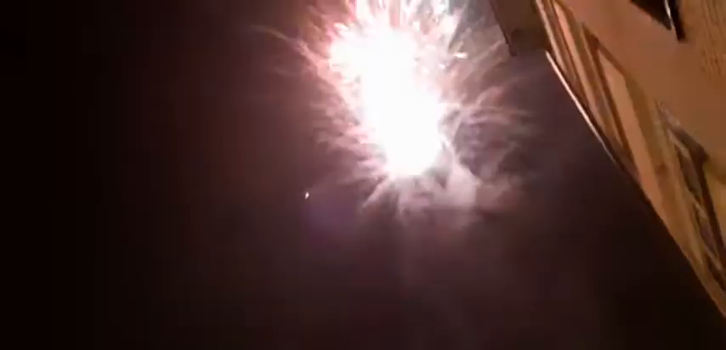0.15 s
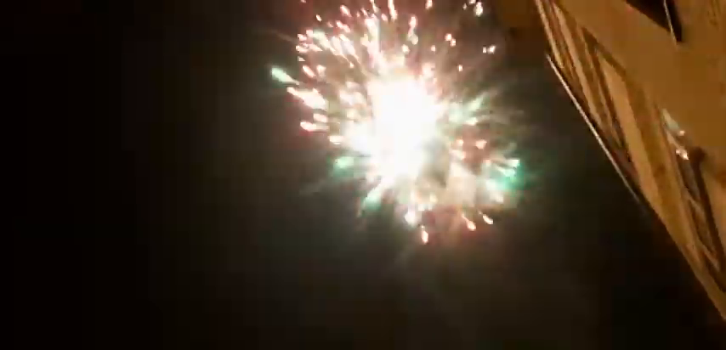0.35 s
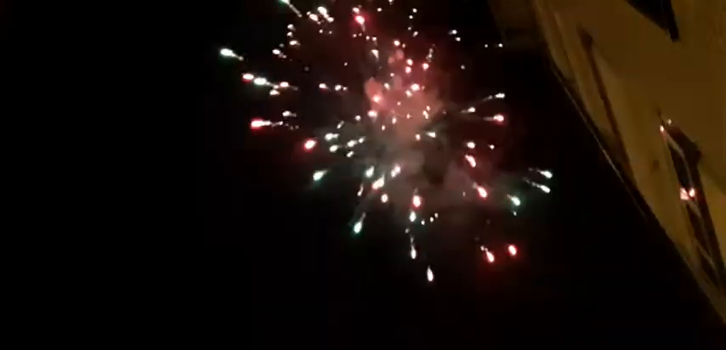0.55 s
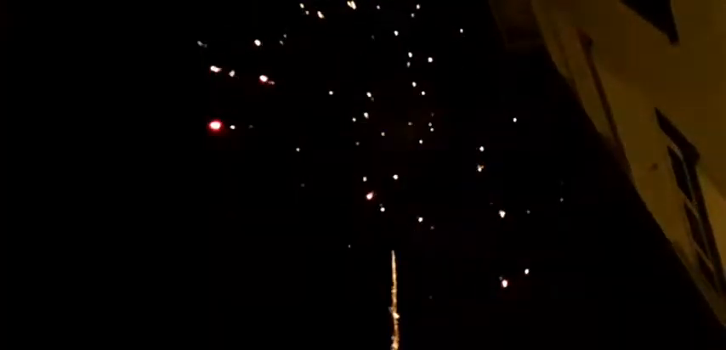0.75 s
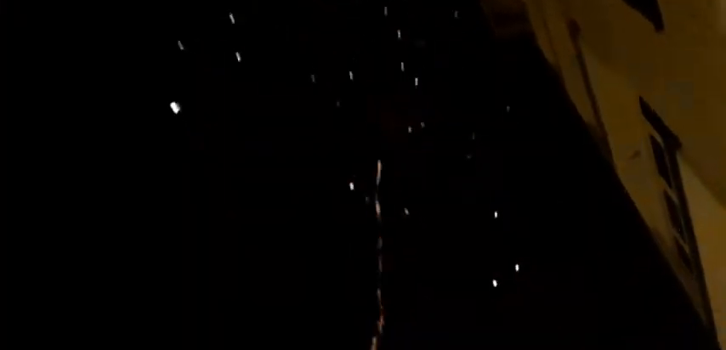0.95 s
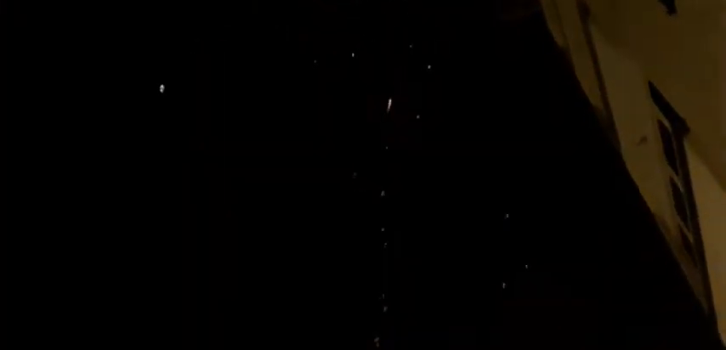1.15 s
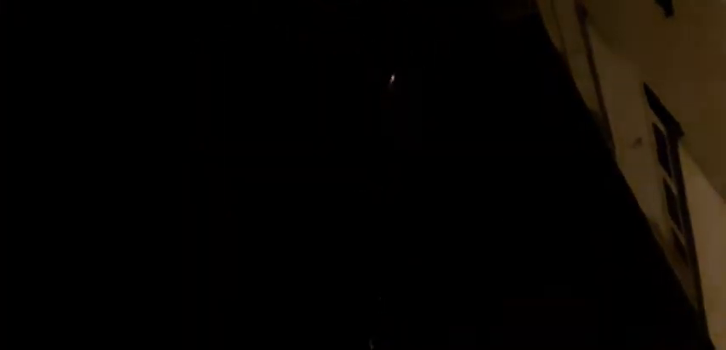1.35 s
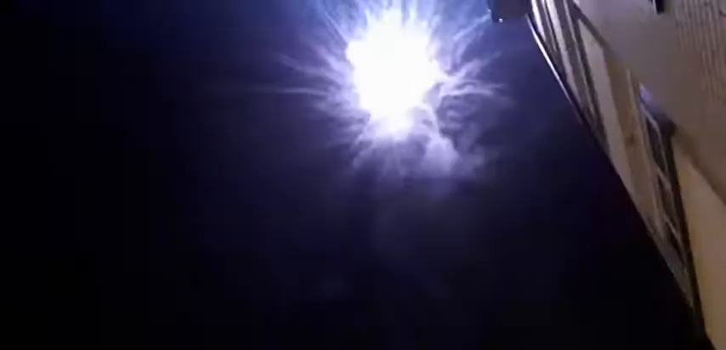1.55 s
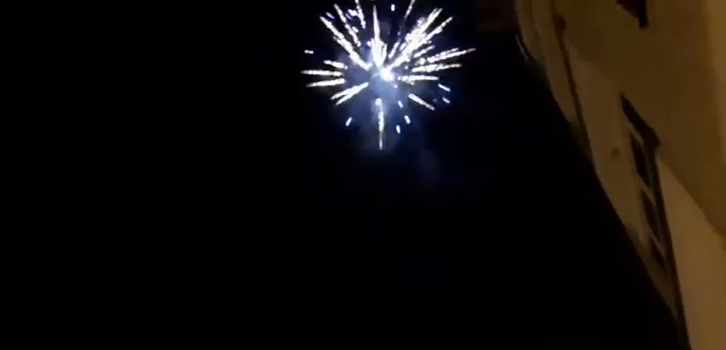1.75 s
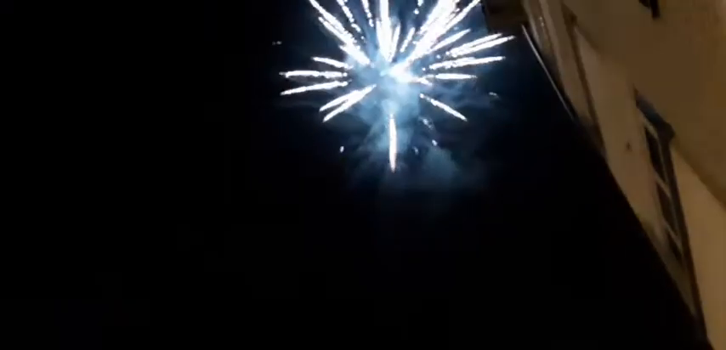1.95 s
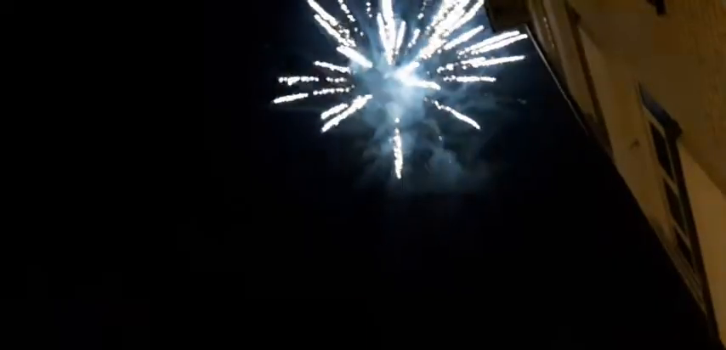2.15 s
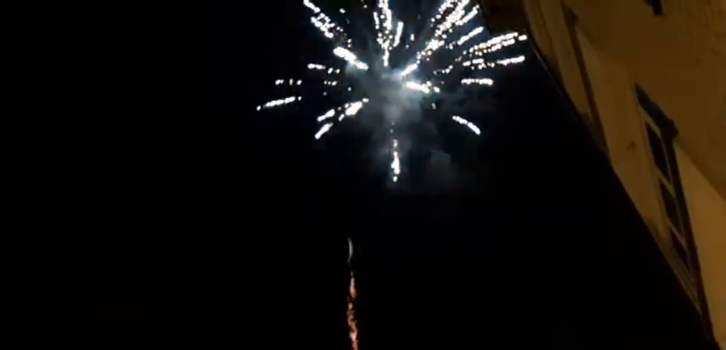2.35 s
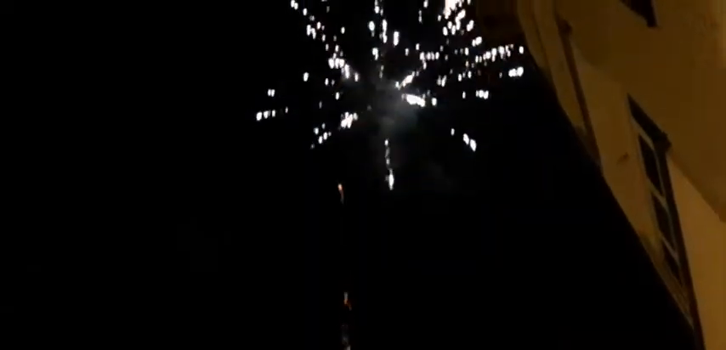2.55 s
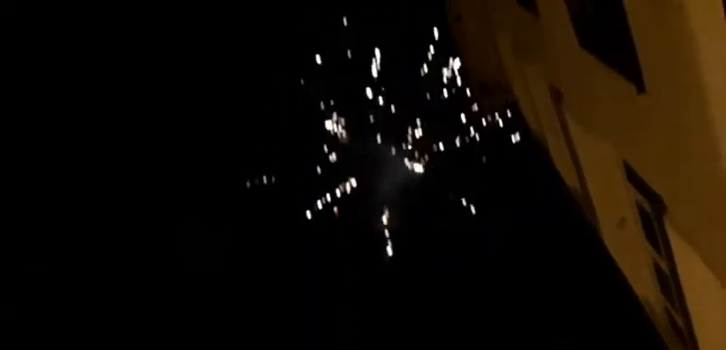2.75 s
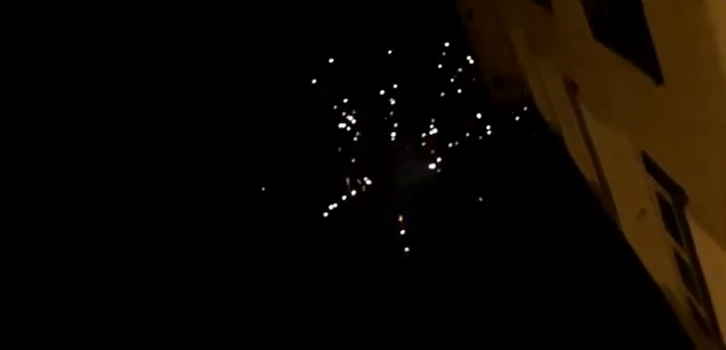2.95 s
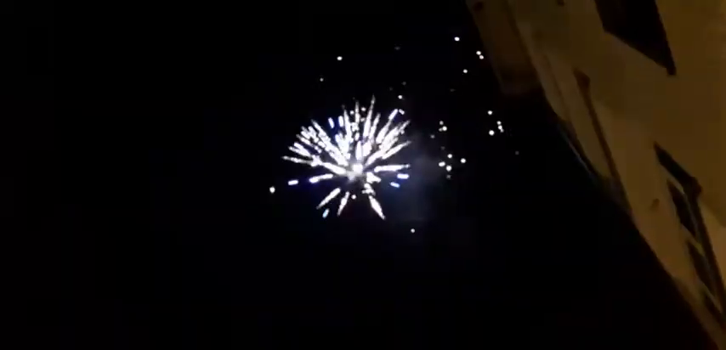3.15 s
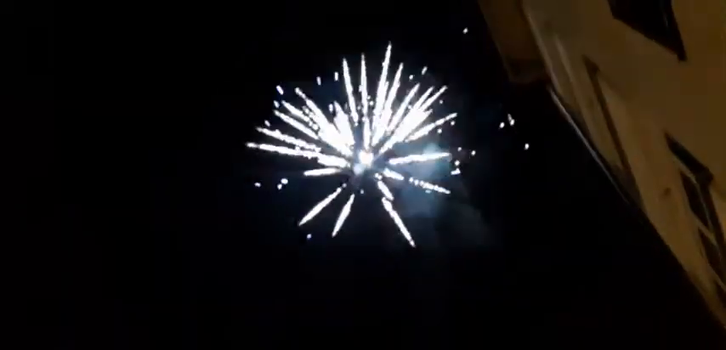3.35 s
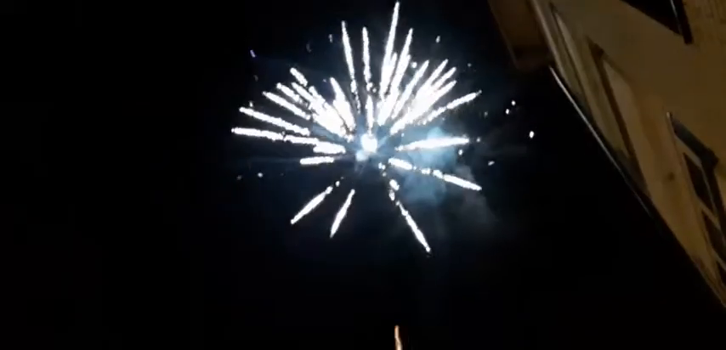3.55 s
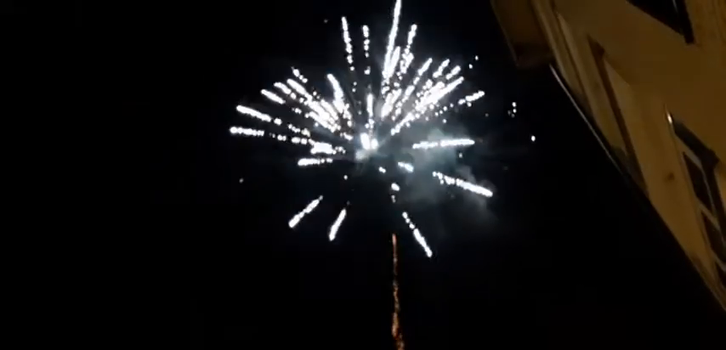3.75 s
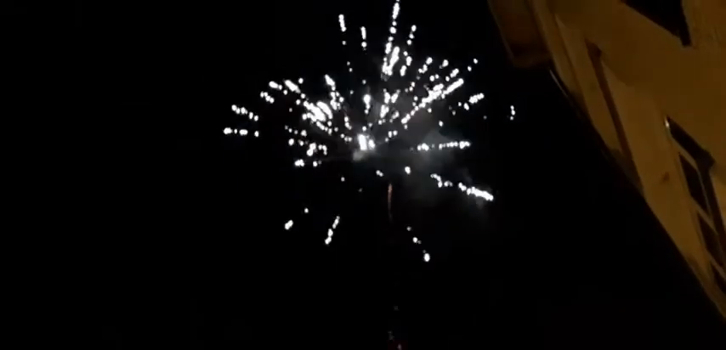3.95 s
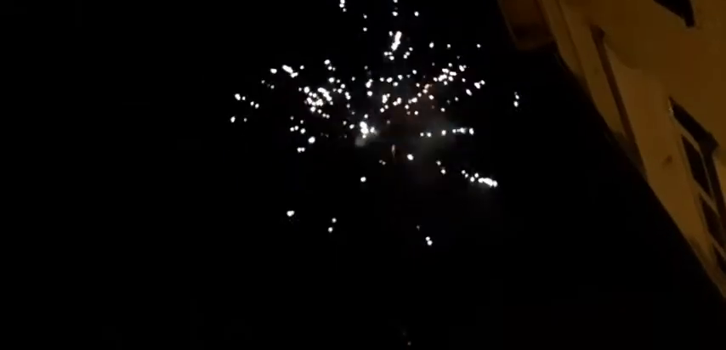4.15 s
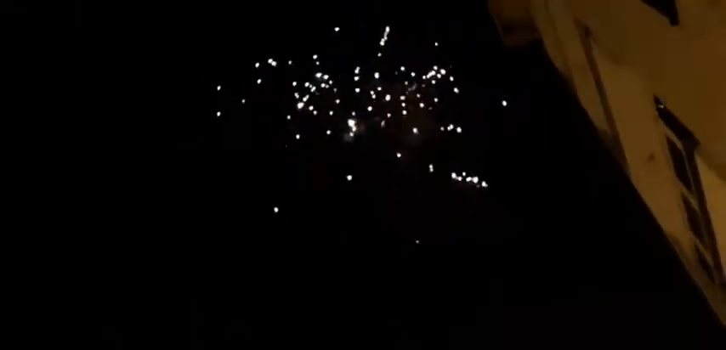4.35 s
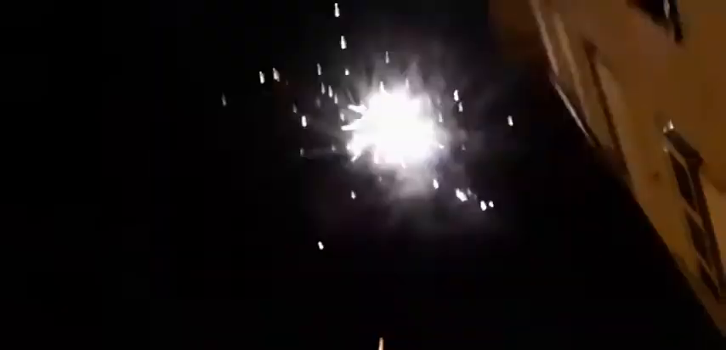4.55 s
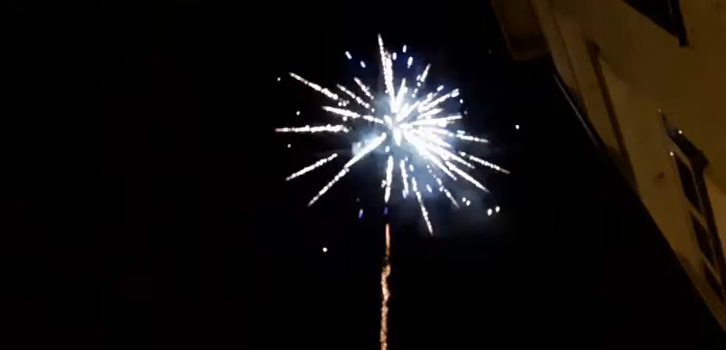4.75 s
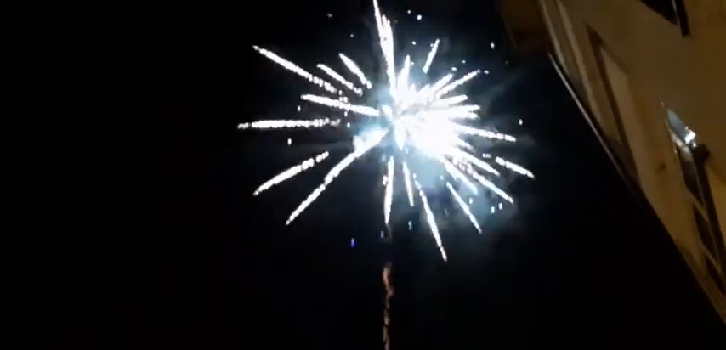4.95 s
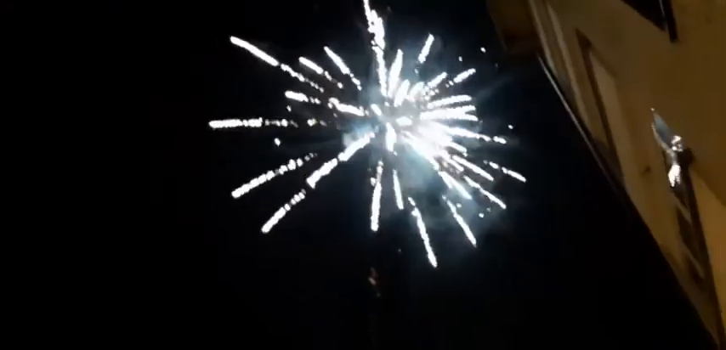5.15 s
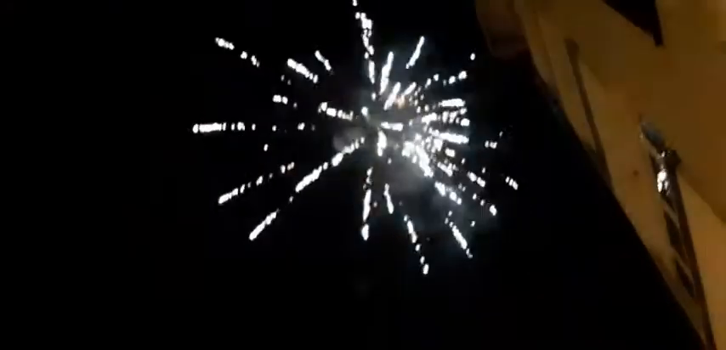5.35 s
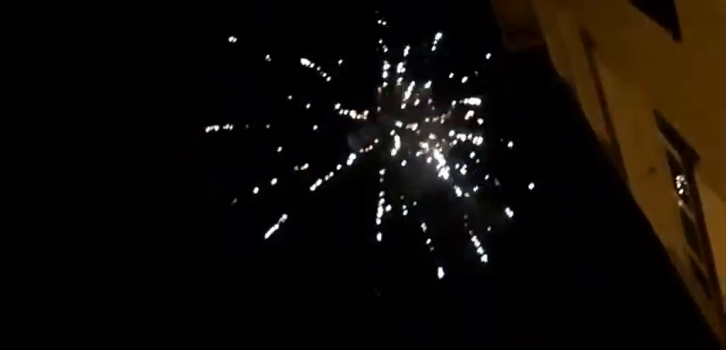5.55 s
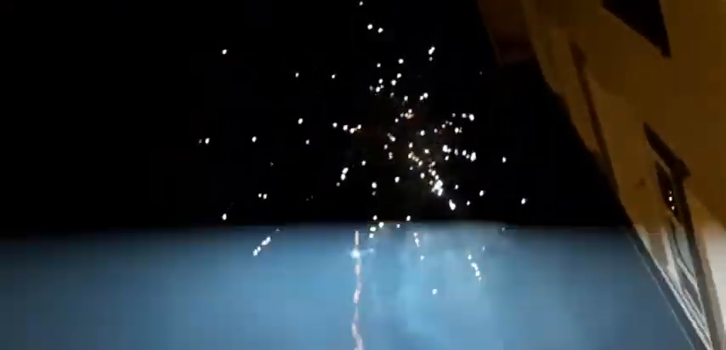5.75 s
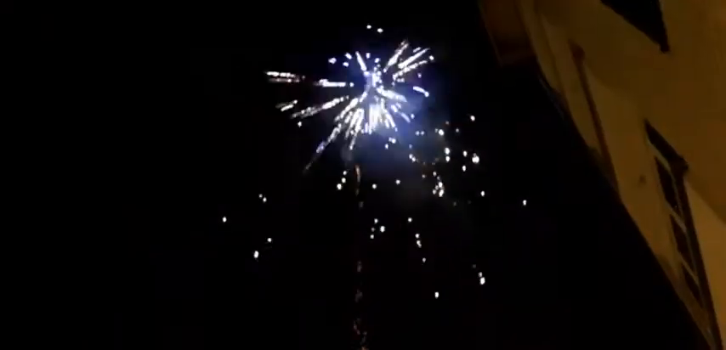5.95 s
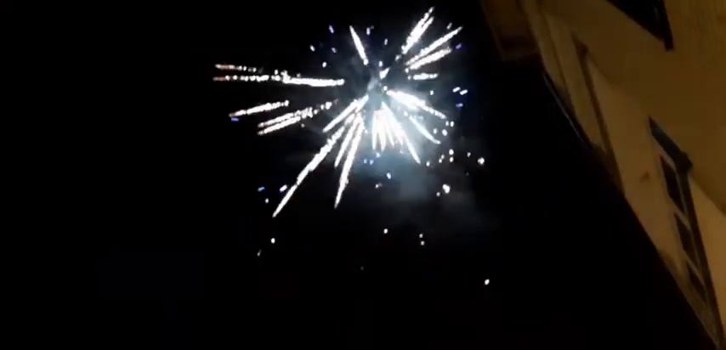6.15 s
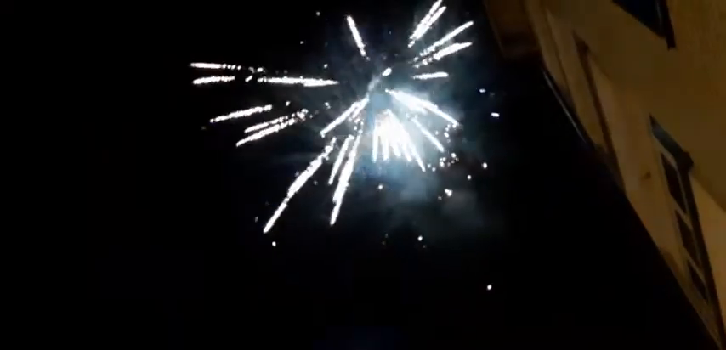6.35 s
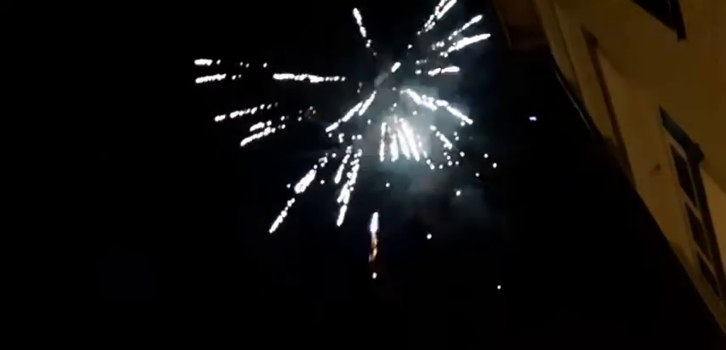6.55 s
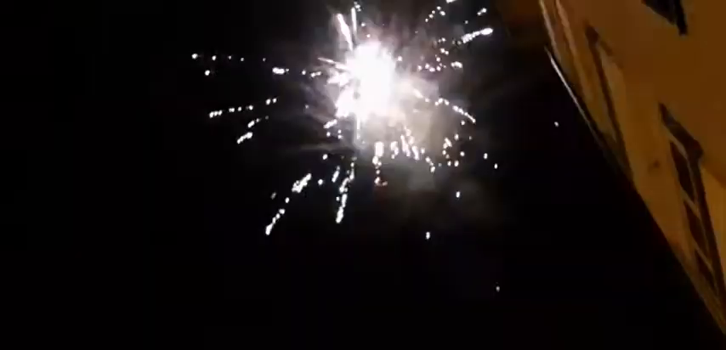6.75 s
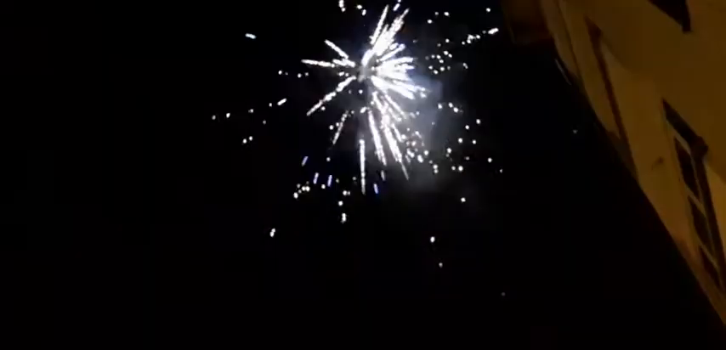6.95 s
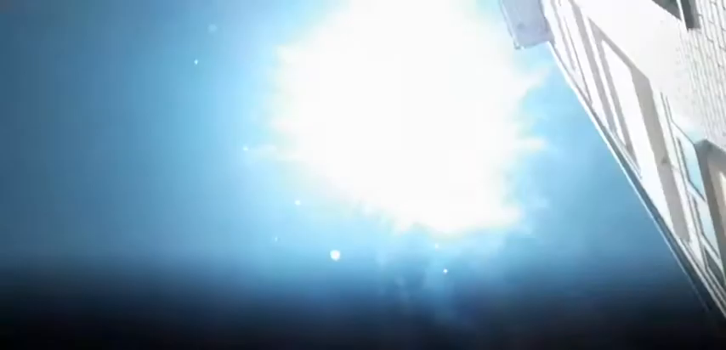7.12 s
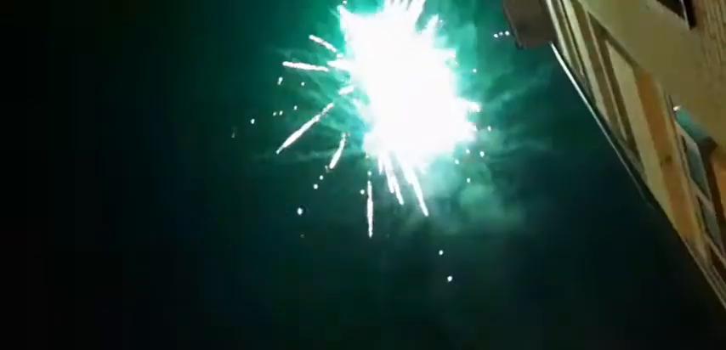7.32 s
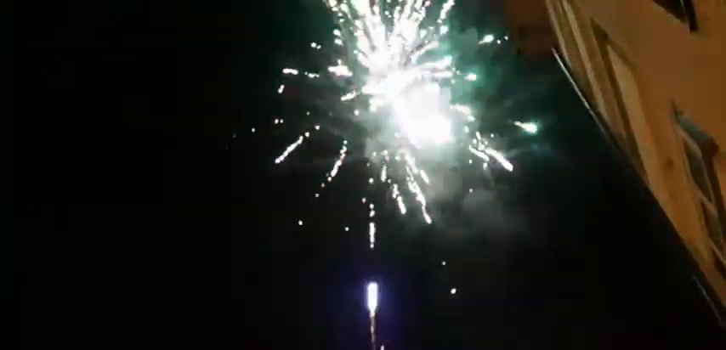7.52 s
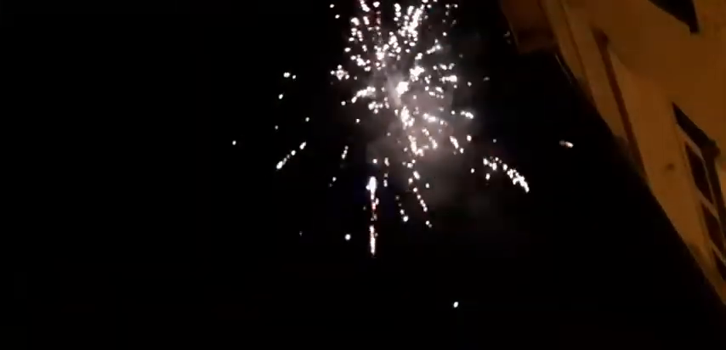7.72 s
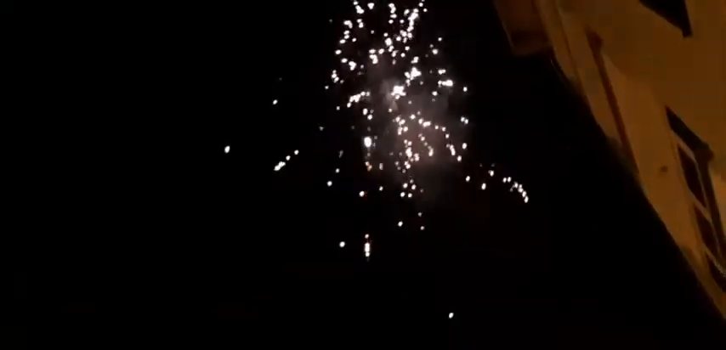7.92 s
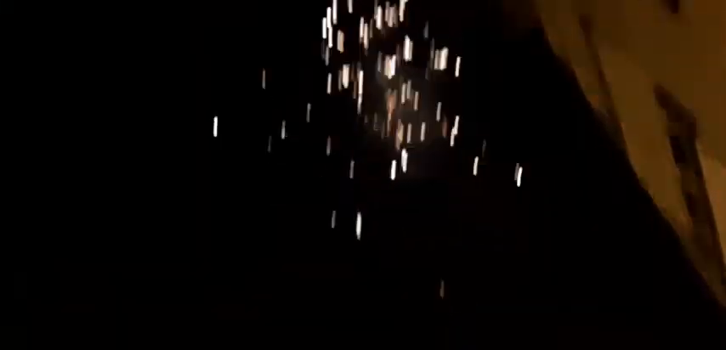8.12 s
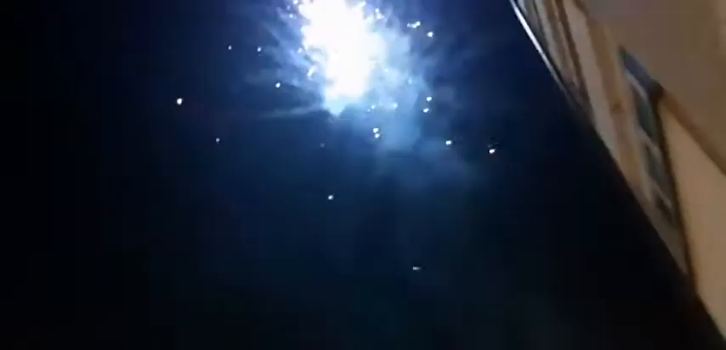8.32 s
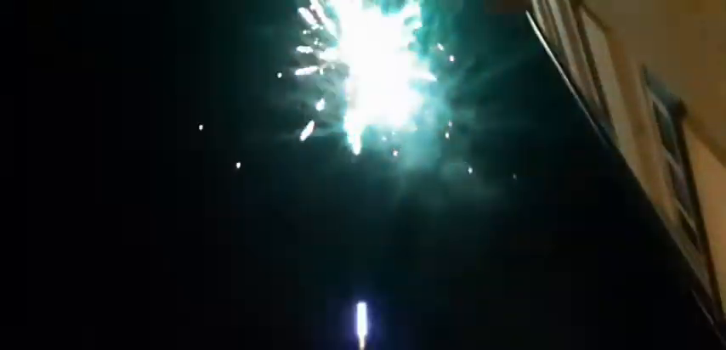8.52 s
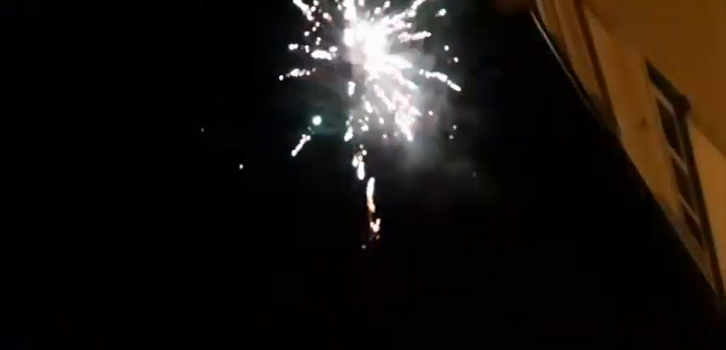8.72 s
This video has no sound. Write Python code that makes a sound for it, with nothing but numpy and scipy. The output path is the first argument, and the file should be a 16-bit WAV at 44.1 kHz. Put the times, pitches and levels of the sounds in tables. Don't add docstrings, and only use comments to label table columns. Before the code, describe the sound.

A fading echo and tiny star snaps lead into a tight cluster at 0.14-0.4 s: two ragged overhead cracks with mortar thumps, then dull far slaps near 0.8-1.0 s. A very loud burst hits at 1.66 s, a launch thump at 1.94 s, and a smaller pop to the right at 2.39 s among distant slaps. At 3.1 s a burst fills the street with its fullest wash, a thump follows at 3.27 s, and bright crackling runs from 3.5 to 4.1 s. A strong slap comes at 3.8 s, a right-hand pop and thump at 4.3 s, a loud burst at 4.6 s and a thump at 5.4 s. The closing run brings blasts at 5.9, 6.2 and 6.8 s, then near-simultaneous burst-and-mortar pairs at 7.24 and 8.33 s. Each blast echoes off close houses, then decays treble first over a low night hum.

```python
import sys
import numpy as np
from scipy import signal
from scipy.fft import rfft, irfft, next_fast_len
from scipy.io import wavfile
from scipy.ndimage import uniform_filter1d

SR = 44100
rng = np.random.default_rng(int(sys.argv[2]) if len(sys.argv) > 2 else 0)


def output_pcm(signal):
    pcm = np.clip(np.atleast_2d(signal).T, -1, 1) * 32767
    wavfile.write(sys.argv[1], SR, np.round(pcm).astype(np.int16))


def linear_from_db(decibels):
    return 10 ** (np.asarray(decibels, float) / 20)


N = 387198

# start in seconds [s], peak level [dB], wash level [dB].
MORTAR_SHOTS = [
    (0.236, -26, -19.5),
    (0.3893, -7, -21.5),
    (1.9389, -8.5, -22.5),
    (3.2692, -6.5, -18),
    (4.3427, -6, -20),
    (5.385, -4.2, -20),
    (6.1882, -5, -19),
    (7.2356, -6.5, -15),
    (8.3232, -3.5, -14),
]
# start in seconds [s], peak level [dB], wash level [dB].
SHELL_BURSTS = [
    (0.1425, -3.2, -15.5),
    (0.2467, -2, -14),
    (1.6601, -1, -10.5),
    (3.105, -2.5, -9),
    (4.6199, -1, -12),
    (5.9167, -2, -14),
    (6.8255, -2, -14.5),
    (7.2385, -3, -18.5),
    (8.3387, -3.5, -18),
]
# start in seconds [s], peak level [dB], wash level [dB].
SIDE_SHOTS = [
    (2.3898, -4.5, -33),
    (4.307, -3.5, -29.5),
    (5.9043, -4.5, -38),
    (7.0953, -6.5, -30),
]
# arrival in seconds [s], peak level [dB].
FAR_SLAPS = [(0.827, -12.5), (0.9582, -10.5), (2.363, -9.5), (2.4193, -9.5), (2.462, -32), (2.717, -18.5),
             (3.8203, -6), (4.17, -23), (5.3255, -12), (6.608, -14), (6.7228, -27), (7.127, -12.5),
             (7.9422, -11.5), (7.981, -24)]
# start in seconds [s], peak level [dB].
STAR_SNAPS = [(0.0356, -22.5), (0.068, -22), (0.0958, -22), (0.8307, -29), (1.0827, -26.5), (2.7144, -32),
              (2.7195, -49), (3.477, -18.5), (3.517, -18.5), (3.551, -17.5), (3.568, -25), (3.5713, -16),
              (3.603, -20.5), (3.6378, -36), (3.6655, -22.5), (3.765, -25), (3.778, -21), (3.9093, -27.5),
              (3.9714, -25), (3.9768, -26.5), (4.0283, -43), (4.0885, -34), (4.105, -32), (5.247, -37),
              (5.7073, -30), (6.4523, -67.5), (6.489, -27), (6.567, -27.5), (6.589, -27.5), (8.295, -39)]

# delay in seconds [s], level [dB], side [-1 right .. 1 left].
MORTAR_PATHS = [(0, 0, .25), (.0031, -8, -1), (.0082, -9, .8)]
# delay in seconds [s], level [dB], side [-1 right .. 1 left].
BURST_PATHS = [(0, 0, .25), (.0086, -1, .8)]
# delay in seconds [s], level [dB], side [-1 right .. 1 left].
STAR_PATHS = [(0, 4, .45), (.0034, -3, -.65), (.0045, 0, .9)]
# delay in seconds [s], level [dB], side [-1 right .. 1 left].
SIDE_PATHS = [(0, -1, -1), (.0014, -6, -1), (.0024, -10, -.8), (.01, -14, -.8), (.0115, -14, -.8)]
# delay in seconds [s], level [dB], side [-1 right .. 1 left].
FACING_ROW = [(.0237, -3, -.6), (.0243, -4, -.6), (.0254, -9, -.6), (.0305, -9, -.6)]
# delay in seconds [s], level [dB], side [-1 right .. 1 left].
FAR_ROWS = [(.0805, -7, -.3), (.0818, -11, -.3), (.1015, -14, .4)]
# delay in seconds [s], level [dB], side [-1 right .. 1 left].
END_WALL = [(.092, -1, -.5), (.101, -3, -.2), (.122, -9, -.4), (.161, -14, -.4)]

# frequency [Hz], density [dB per Hz].
WASH_COLOUR = [(15, -84.5), (25, -71.5), (97, -10), (259, 0), (422, -4), (706, -1.5), (787, -4),
               (1680, -11), (2530, -12), (4480, -19.5), (7510, -31), (9330, -23.5), (14800, -30.5),
               (16500, -39)]
# frequency [Hz], first t60 in seconds [s], late t60 [s], late part [dB].
STREET_DECAY = [(38.7, 0.47, 5.2, -17), (148, 0.32, 2.35, -11), (524, 0.49, 1.43, -5),
                (1580, 0.6, 1.92, -6.5), (4130, 0.62, 1.84, -12), (6940, 0.71, 0.72, -13.5),
                (14370, 0.29, 2.3, -32)]
# frequency [Hz], density [dB per Hz].
NIGHT_COLOUR = [(15, -58), (25, -33.5), (38, -12.5), (249, 5), (386, 8.5), (555, 0.5), (737, 9), (2020, 0),
                (12000, -52.5), (15600, -75), (22000, -120)]
# frequency [Hz], left-right likeness [clipped to 0..1].
PORT_LIKENESS = [(30, .4), (60, .6), (130, 1), (250, 0.9), (550, 0.82), (1650, -1.8), (4970, -1.1),
                 (15000, 0.23)]
# frequency [Hz], gain [dB].
RECORDER_RESPONSE = [(20, -24), (60, -7), (130, 1.13), (7600, -2), (8600, -11.5), (10500, -12.5), (12500, -8.5),
                     (15700, -5.5), (16080, -40), (17500, -63)]

NIGHT_DB = -49.5
STEP = 16


def at_hz(points, hz, column=1):
    points = np.array(points)
    return np.interp(np.log(hz), np.log(points[:, 0]), points[:, column])


def band(x, low_hz, high_hz):
    sos = signal.butter(2, [low_hz, min(high_hz, .45 * SR)], "band", fs=SR, output="sos")
    return signal.sosfilt(sos, x)


def n_wave(length_ms, sharp):
    u = np.linspace(0, 1, max(round(length_ms * SR / 1000), 4))
    return sharp * (1 - 2 * u) + (1 - sharp) * np.sin(2 * np.pi * u)


def place(events, pulses, paths, scatter_db):
    port_gap_ms = .25
    smear_ms, smear_ms_per_db = .02, .004
    out = np.zeros((2, N + 8192))
    for (s, db, *_), pulse in zip(events, pulses):
        chances = rng.standard_normal(len(paths))
        for (delay, path_db, side), chance in zip(paths, chances):
            width = max(round((smear_ms - smear_ms_per_db * path_db) * SR / 1000), 1)
            padded = np.pad(pulse * np.ones((2, 1)), ((0, 0), (width, width)))
            heard = uniform_filter1d(padded, width)
            heard *= linear_from_db(db + path_db + scatter_db * chance * (delay > 0))
            for port, late in enumerate([0, side * port_gap_ms / 1000]):
                i = round((s + delay + late) * SR) - width
                out[port, i:i + heard.shape[1]] += heard[port]
    return out[:, :N]


def ragged_blast(length_ms, swing_ms, spikes_db):
    n = round(.008 * SR)
    shape = np.exp(-(np.arange(n) / (length_ms * SR / 1000)) ** 4)
    fronts = rng.standard_normal(n) * (rng.random(n) < .06)
    fronts[0] = 2
    body = np.convolve(fronts * shape, n_wave(swing_ms, sharp=1.0))[:n] / 2
    debris = linear_from_db(spikes_db) * shape * rng.standard_normal((2, n))
    return np.tanh(1.83 * (body + debris))


def house_fronts():
    fronts = []
    for k, delay in enumerate(np.linspace(.015, .077, 9)):
        side = -.4 if k % 4 < 3 else .4
        fronts.append((delay, -5 - 49 * delay, side))
    return fronts + END_WALL


def bursts():
    pulses = [ragged_blast(2.8, 0.6, -6) for _ in SHELL_BURSTS]
    out = place(SHELL_BURSTS, pulses, BURST_PATHS, scatter_db=1)
    for front in house_fronts():
        copies = [ragged_blast(1.3, 0.8, -12) for _ in SHELL_BURSTS]
        out += linear_from_db(-5) * place(SHELL_BURSTS, copies, [front], scatter_db=2.5)
    return band(out, 90, 17000)


def launches():
    n = 440
    fade = np.exp(-np.arange(n) / (0.0061 * SR))
    swing = np.pad(n_wave(.88, sharp=.35), (0, n))[:n]
    pulses = [swing + .2 * fade * rng.standard_normal((2, n)) for _ in MORTAR_SHOTS]
    heard = place(MORTAR_SHOTS, pulses, MORTAR_PATHS + FAR_ROWS, scatter_db=1)
    facing = place(MORTAR_SHOTS, pulses, FACING_ROW, scatter_db=1)
    heard += linear_from_db(3) * band(facing, 900, 16000)
    return linear_from_db(5) * band(heard, 150, 15000)


def thuds():
    n = 6000
    shots = [(s, db - 1.5) for s, db, _ in MORTAR_SHOTS] + SHELL_BURSTS
    fade = linear_from_db(-60 * np.arange(n) / SR / .08)
    first_push = np.arange(n) == 0
    rolls = []
    for _ in shots:
        bumps = rng.standard_normal(n) * (rng.random((2, n)) < .01)
        rolls.append(fade * bumps + first_push)
    push = n_wave(9, sharp=0.1)
    pulses = [signal.fftconvolve(roll, push[None])[:, :n] for roll in rolls]
    return linear_from_db(-24) * band(place(shots, pulses, [(0, 0.016, 0.018)], scatter_db=0), 22, 170)


def side_shots():
    pulse = np.concatenate([np.hanning(16), -.5 * np.hanning(32)])
    heard = place(SIDE_SHOTS, [pulse] * len(SIDE_SHOTS), SIDE_PATHS, scatter_db=1)
    return linear_from_db(-0.9) * band(heard, 230, 9000)


def crackle():
    n = 300
    fade = np.exp(-np.arange(n) / (.0012 * SR))
    snap = np.pad(n_wave(.22, sharp=0.5), (0, n))[:n]
    pulses = [.25 * fade * rng.standard_normal((2, n)) + snap for _ in STAR_SNAPS]
    return linear_from_db(3.4) * band(place(STAR_SNAPS, pulses, STAR_PATHS, scatter_db=2), 1300, 10000)


def far_slaps():
    n = 700
    fade = np.exp(-np.arange(n) / (0.013 * SR))
    swing = np.pad(n_wave(.72, sharp=.4), (0, n))[:n]
    out = 0
    for k in range(4):
        pulses = [swing + 0.5 * fade * rng.standard_normal((2, n)) for _ in FAR_SLAPS]
        wall_step = (.001 * k ** 1.4, -3.5 * abs(k - 1), .9)
        out += place(FAR_SLAPS, pulses, [wall_step], scatter_db=2.5)
    return linear_from_db(-3.8) * band(band(out, 670, 2700), 200, 4800)


def dying(power, t60):
    r = linear_from_db(-120 * STEP / (t60 * SR))
    return signal.lfilter([1 - r], [1, -r], power) / (1 - r)


def wash_power(events, hz):
    t = np.arange(N // STEP + 1) * STEP / SR
    held, kicks, late = np.zeros((3, len(t)))
    for s, wash_db, tilt_db, hold_s, top_hz in events:
        power = linear_from_db(wash_db + tilt_db * np.log2(hz / 700)) ** 2 / (1 + (hz / top_hz) ** 6)
        power /= 1 + (top_hz < 1e4) * (top_hz / 18.0 / hz) ** 3
        a, b = np.searchsorted(t, [s, s + max(hold_s, .002)])
        held[a:b] += power
        kicks[min(b, len(t) - 1)] += power
        late[a] += power
    first = held + dying(kicks, at_hz(STREET_DECAY, hz, column=1))
    late_gain = linear_from_db(at_hz(STREET_DECAY, hz, column=3)) ** 2
    power = first + late_gain * dying(late, at_hz(STREET_DECAY, hz, column=2))
    swell = np.exp(-STEP / SR / (.001 + .3 / hz))
    return signal.lfilter([1 - swell], [1, -swell], power), held


def front_slaps(events, per_s, slap_db):
    supply = dying(wash_power(events, 700)[1], 0.062)
    held = np.repeat(np.sqrt(supply * STEP / SR / 0.0099), STEP)[:N]
    clicks = (rng.random(N) < per_s / SR) * rng.exponential(1, N) * held * linear_from_db(slap_db)
    push = np.convolve(clicks, n_wave(1.177, sharp=0.2))[:N]
    snap = np.convolve(clicks, n_wave(0.14, sharp=0.33))[:N]
    left = push + 0.37 * snap
    right = np.roll(push, -4) + 0.92 * np.roll(snap, 7)
    return band(np.array([left, right]), 210, 9000)


def wander(memory, scale):
    return signal.lfilter([1], [1, -memory], rng.standard_normal(N // STEP + 1)) * scale


def street(events, lumpy_db, patchy_db, flutter_db):
    white = rng.standard_normal((2, 2, N))
    flutter = wander(.9, .44)
    edges = 22 * 2 ** np.arange(0, 9.7, .4)

    def total_power(table):
        return linear_from_db(at_hz(table, edges)) ** 2 @ edges * .28

    out = 0
    for k, (low, high) in enumerate(zip(edges, edges[1:])):
        mid, side = band(white[k % 2], low, high) * np.sqrt(SR / 4)
        hz = np.sqrt(low * high)
        alike = np.clip(at_hz(PORT_LIKENESS, hz), 0, 1)
        lumps = wander(.95, .31)
        patches = wander(.99, .14)
        flicker_db = lumpy_db * lumps + patchy_db * patches + flutter_db * flutter * (hz > 400)
        colour = linear_from_db(at_hz(WASH_COLOUR, hz) + flicker_db) ** 2 / total_power(WASH_COLOUR)
        wash = wash_power(events, hz)[0] * colour
        night = linear_from_db(NIGHT_DB + at_hz(NIGHT_COLOUR, hz)) ** 2 / total_power(NIGHT_COLOUR)
        gain = np.interp(np.arange(N) / STEP, np.arange(len(wash)), np.sqrt(wash + night))
        out = out + gain * (np.sqrt(1 + alike) * mid + np.sqrt(1 - alike) * side * [[1], [-1]])
    return out


def near_wash():
    open_hz = 30000
    burst_tilt_db, burst_swell_s, burst_hold_s = 2.07, .013, .082
    mortar_tilt_db, facing_row_s, mortar_hold_s = 2.56, .023, .024
    near = []
    for s, _, db in SHELL_BURSTS:
        near.append((s, db - 9, burst_tilt_db, burst_swell_s, open_hz))
        near.append((s + burst_swell_s, db - 7.0, burst_tilt_db, burst_hold_s - burst_swell_s, open_hz))
    for s, _, db in MORTAR_SHOTS:
        near.append((s, db - 5, mortar_tilt_db, facing_row_s, open_hz))
        near.append((s + facing_row_s, db - 7.0, mortar_tilt_db, mortar_hold_s, open_hz))
    return near


def small_wash():
    far = [(s, db - 29.5, 0.5, .005, 4500) for s, db in FAR_SLAPS]
    far += [(s, db, 0.5, .005, 4500) for s, _, db in SIDE_SHOTS]
    stars = [(s, db - 22, 2.5, .008, 9000) for s, db in STAR_SNAPS]
    return far + stars


def scene():
    earlier = [(0, -45.5, -0.36, .002, 11000)]
    near = near_wash()
    wash = street(earlier + near + small_wash(), lumpy_db=2.5, patchy_db=2.04, flutter_db=0.5)
    wash = wash + front_slaps(near, per_s=280, slap_db=1.5)
    return launches() + bursts() + far_slaps() + side_shots() + crackle() + thuds() + wash


def low_pass(x):
    return signal.sosfilt(signal.butter(12, 17020, fs=SR, output="sos"), x)


def record(dry):
    rounded = dry / (1 + (dry / 1.1) ** 4) ** .25
    rounded += linear_from_db(-72.5) * rng.standard_normal(dry.shape)
    size = next_fast_len(N + 4096)
    hz = np.maximum(np.arange(size // 2 + 1) * SR / size, 1)
    colour = linear_from_db(at_hz(RECORDER_RESPONSE, hz))
    mix = irfft(rfft(rounded, size) * colour, size)[:, :N]
    return low_pass(mix)


dry = scene()
out = record(dry)
output_pcm(out)
```